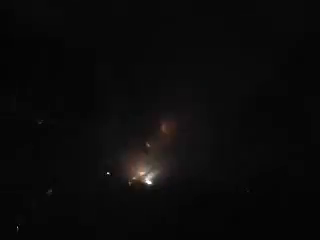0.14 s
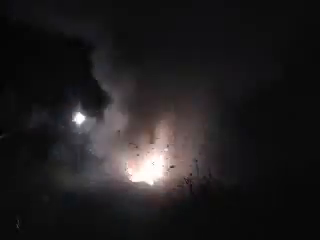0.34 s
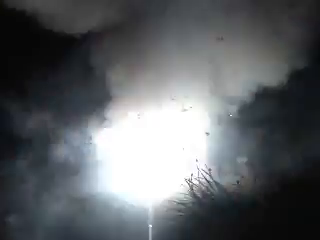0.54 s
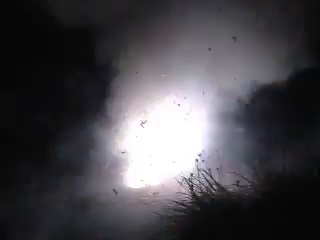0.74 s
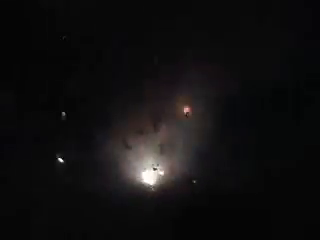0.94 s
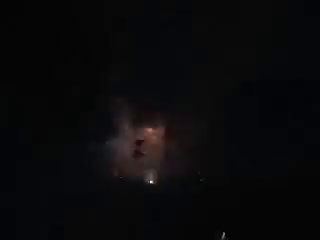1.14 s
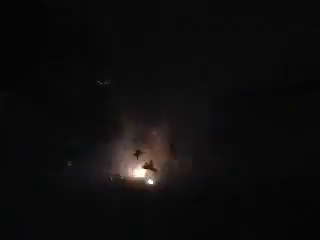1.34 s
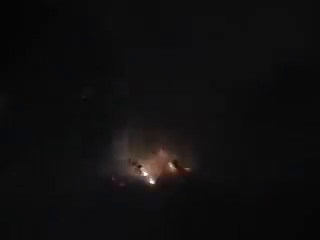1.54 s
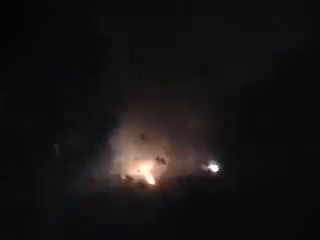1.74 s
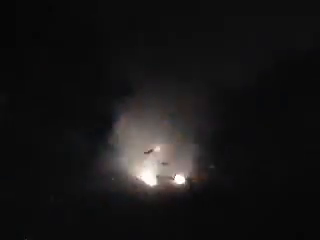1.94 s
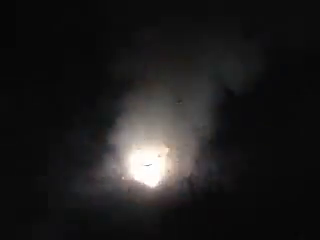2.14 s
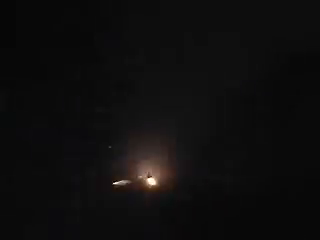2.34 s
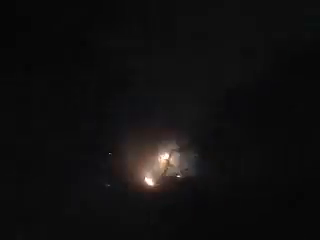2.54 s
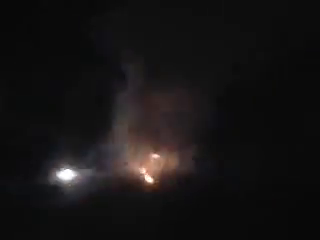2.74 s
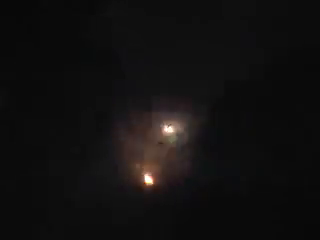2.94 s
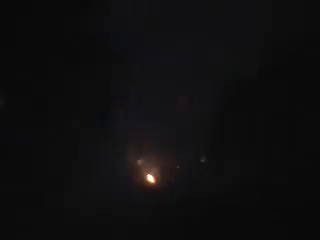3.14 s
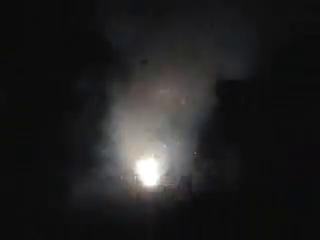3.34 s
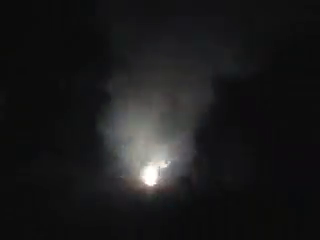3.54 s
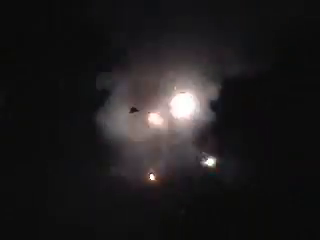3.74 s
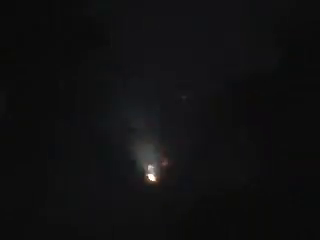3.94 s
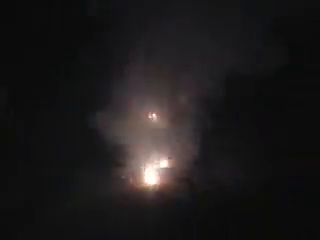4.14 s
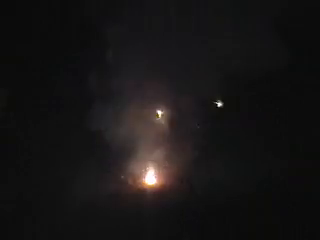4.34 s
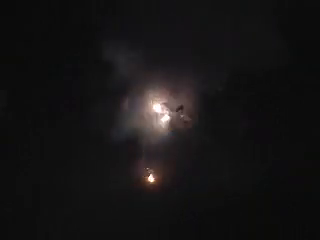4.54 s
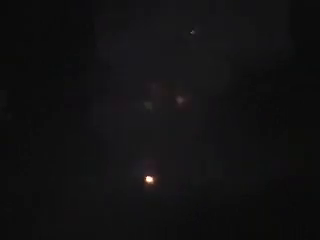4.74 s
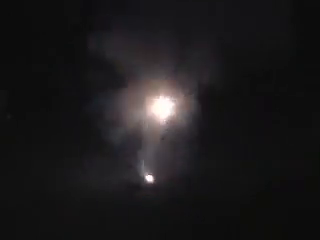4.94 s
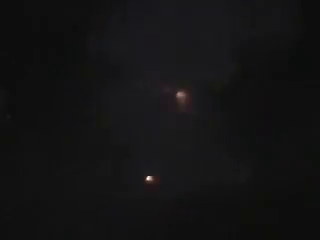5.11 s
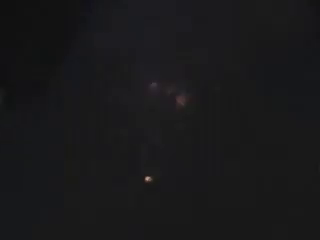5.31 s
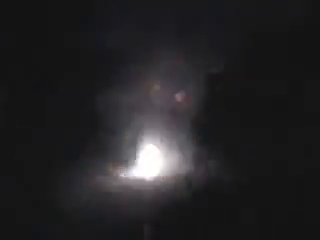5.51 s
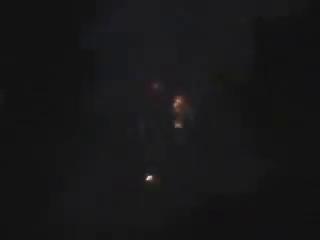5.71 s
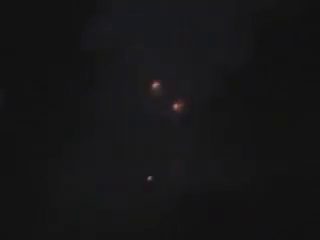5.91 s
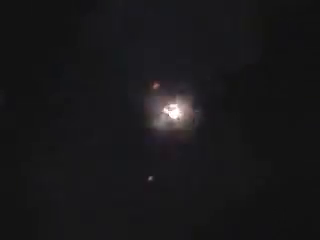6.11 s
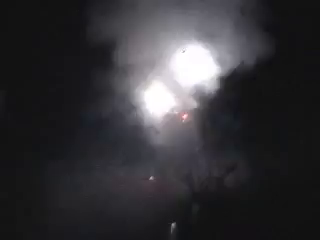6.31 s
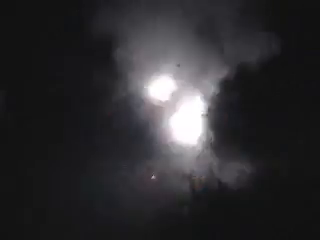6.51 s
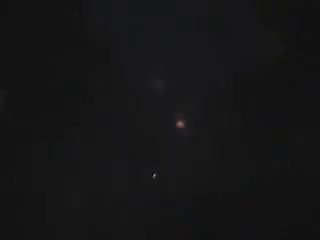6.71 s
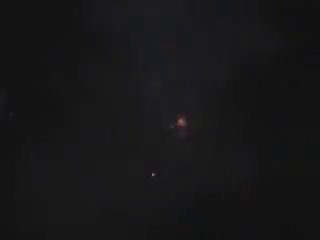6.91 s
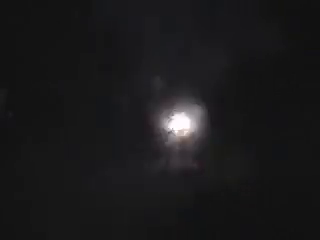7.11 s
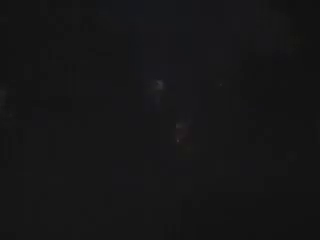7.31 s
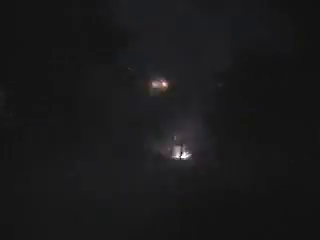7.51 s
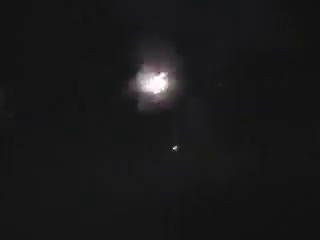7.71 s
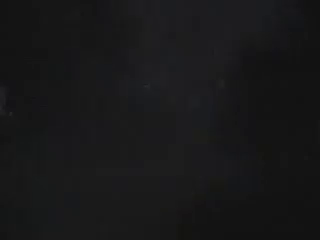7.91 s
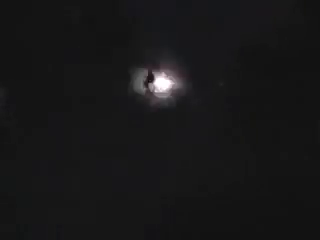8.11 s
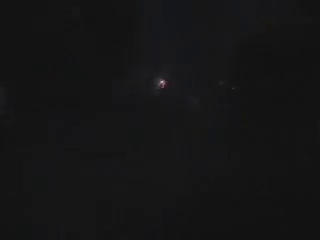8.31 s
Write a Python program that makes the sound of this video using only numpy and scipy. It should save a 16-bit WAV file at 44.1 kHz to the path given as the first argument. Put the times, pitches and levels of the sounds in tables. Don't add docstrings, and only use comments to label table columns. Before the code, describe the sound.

Hundreds of firecracker blasts tear out in a faltering swarm, overloading a small camera microphone, before breaking into separate cracks over a dull outdoor echo.

```python
import sys
import numpy as np
from scipy import signal
from scipy.fft import rfft, irfft, next_fast_len
from scipy.io import wavfile
from scipy.ndimage import uniform_filter1d

SR = 44100
rng = np.random.default_rng(int(sys.argv[2]) if len(sys.argv) > 2 else 0)


def amplitude_ratio(level_db):
    exponent = np.asarray(level_db, float) / 20
    return 10 ** exponent


def materialize(psi):
    bounded = np.clip(np.atleast_2d(psi).T, -1, 1)
    quanta = np.round(bounded * 32767).astype(np.int16)
    wavfile.write(sys.argv[1], SR, quanta)


N = 368676


def rms_one(x):
    return x / np.sqrt(np.mean(x ** 2) + 1e-20)


def in_time(rows):
    s, *columns = np.transpose(rows)
    return [np.interp(np.arange(N) / SR, s, c) for c in columns]


def at_hz(points, hz):
    table_hz, value = np.array(points).T
    return np.interp(np.log(hz + 1), np.log(table_hz), value)


def butter(x, order, hz, kind="low"):
    return signal.sosfilt(signal.butter(order, hz, kind, fs=SR, output="sos"), x)


def butter_zero_phase(x, order, hz, kind="low"):
    return signal.sosfiltfilt(signal.butter(order, hz, kind, fs=SR, output="sos"), x)


def colour(mid, side, spectrum, side_db):
    size = next_fast_len(N)
    hz = np.arange(size // 2 + 1) * SR / size
    gain = rms_one(amplitude_ratio(at_hz(spectrum, hz)))
    m = irfft(rfft(mid, size) * gain, size)[:N]
    s = irfft(rfft(side, size) * gain * amplitude_ratio(at_hz(side_db, hz)), size)[:N]
    return np.array([m + s, m - s])


def grainy(spread_db, per_s):
    sizes = amplitude_ratio(spread_db * np.minimum(rng.exponential(1, N), 3)) * (rng.random(N) < per_s / SR)
    swells = signal.lfilter([1], [1, -.96], sizes)
    return rms_one(rng.standard_normal(N) * (1 + swells))


def train(at, db):
    return np.bincount(at.astype(int), amplitude_ratio(db), N)[:N] + 1e-18


def all_blasts():
    # t/s, level/dB
    swarm_level = [
        (0.0, -7),
        (0.49, -5.5),
        (0.52, -8.5),
        (1.22, -7),
        (2.06, -8.5),
        (2.2, -7.5),
        (2.9, -8),
        (3.6, -11),
    ]
    # t of return/s, length/s, depth/dB
    lulls = [(0.037, 0.033, 16), (0.39, .05, 13), (0.569, 0.033, 12.5), (0.656, 0.037, 20),
             (0.704, 0.054, 17), (0.917, 0.043, 24), (1.268, 0.056, 34), (2.035, 0.041, 29),
             (2.423, 0.036, 14), (2.115, 0.078, 12), (2.186, 0.026, 22), (2.472, 0.13, 17),
             (2.651, 0.051, 20), (2.785, 0.086, 25), (2.958, 0.14, 8), (3.016, 0.038, 22),
             (3.089, 0.057, 31), (3.174, 0.061, 10), (3.282, 0.067, 30), (3.389, 0.062, 17),
             (3.508, 0.14, 25.5)]
    # t/s, peak level/dB, scatter re peak/dB
    ground_roar = [(0.5316, -9, 4), (0.5816, 0, -4), (0.7123, -5, -3), (0.777, 0, -6), (0.9656, 0, -13),
                   (0.9945, -2, -11), (1.6706, -6, -18), (1.922, -16, -18), (2.0035, -15, -15),
                   (2.2957, -13, 7), (2.3336, -4, -4), (2.4243, -5, -5), (2.4688, -4, -4),
                   (2.7814, -6.5, 0), (2.8305, -3.5, -0.5), (2.9632, -3, -3), (3.02, 0, -12)]
    ground_crackle = [(3.3093, -4, 0.5), (3.3493, -3, -7), (3.58, -6.5, 1), (3.6455, -3, -11),
                      (3.654, -9.5, -8), (3.69, -6, 2), (3.7296, -7, 4), (3.7536, 0, -7),
                      (3.801, -9.5, -14), (3.821, -4, 1), (3.841, -1, -1.5), (3.9164, -2, -11),
                      (3.9427, -4.5, -8), (3.9884, -1, -7), (4.1534, 0, -12), (4.2385, -16, -10),
                      (4.567, -9.5, -0.5), (4.6486, -1, -14), (4.8965, -2.5, -25), (4.9116, -6.5, -20),
                      (5.011, -5, -12), (5.25, -10, -2), (5.3672, -7, -12), (5.461, 1.5, -11),
                      (5.592, -3, -2), (5.6048, -12, -9), (5.6314, -7.5, -18), (5.9012, -6, -4),
                      (5.9296, -5, -20), (5.953, -6.5, -1)]
    ground_stragglers = [(6.0553, -4, -15), (6.1213, -4.5, -7), (6.1484, -0.5, -9), (6.264, -4, -4),
                         (6.4097, -2.5, -1), (6.4263, -3, -8.5), (6.676, -4.5, -5), (6.8683, 5, -17),
                         (6.8812, -7.5, -1), (6.9721, -2.5, -3), (6.9783, -10, -14), (7.0563, -2.5, -6.5),
                         (7.1694, -4, -0.5), (7.2556, -5, -5), (7.3, -17, -18), (7.4385, 4.5, -16),
                         (7.5004, -4, -8), (7.589, -6, -2), (7.623, -14, -16), (7.7647, -3.5, -26),
                         (7.82, -4, -6), (7.9876, 1.5, -5.5), (8.218, 5.5, -14)]
    # t/s, peak level/dB, scatter re peak/dB
    air_roar = [(0.158, -9, -7), (0.187, -6, -10), (0.216, -5, -12), (0.236, -6, -10), (0.2823, -15, -14),
                (0.3765, -5, -7), (0.4, -8, -12), (0.63, -6, -17), (0.6564, -4, -18), (0.7043, -10, -10),
                (0.815, -1, -9), (0.9146, -8, -8), (1.066, -4.5, -10), (1.2077, -10, -6), (1.269, -3, -10),
                (1.474, -3, -14), (1.65, 0, -8), (1.7723, -5, -20), (1.812, -3, -7), (1.951, -2, -14),
                (1.976, -8, -22), (2.04, -6.5, 5), (2.0842, -7, -15), (2.127, -5, -2), (2.1787, -11, -14),
                (2.1974, -2, -11), (2.209, -3.5, 1), (2.2495, -6, -6), (2.3785, -7, -8), (2.5505, -18, -5),
                (2.5794, -8.5, 0), (2.645, -8, -15), (2.6636, -9.5, 7), (2.734, -7, -6), (2.8143, -9, 5),
                (2.8777, -3, -3), (2.9307, -7, -6), (3.0598, -9, -6), (3.0756, -3.5, -14), (3.087, -4, 0),
                (3.124, -11, 4), (3.1551, -7, -6.5), (3.18, -11, 7.5), (3.232, -7.5, -2)]
    air_crackle = [(3.2852, -2.5, -1), (3.394, -12, -12), (3.428, -10, -12), (3.437, -4, -2.5),
                   (3.4697, -1.5, -5), (3.487, -1, -7), (3.512, -3.5, -17), (3.5208, -13.5, 5.5),
                   (3.557, -11, 6), (3.61, -4, -3), (3.708, -2.5, -4), (3.868, -9, -8), (3.926, -6, -7),
                   (4.112, 1.5, -8), (4.172, -16, -15), (4.218, -3, -4), (4.245, -3.5, -2.5),
                   (4.272, -9, -11), (4.3119, -5, 5.5), (4.317, -6, -14), (4.335, -3, -6), (4.374, -3, -2),
                   (4.403, -5, -4.5), (4.4376, -4, -7), (4.521, -1.5, -20), (4.5416, -1.5, -4.5),
                   (4.618, -3, -7.5), (4.67, 0, -3), (4.6922, -0.5, -24), (4.7356, -3.5, -0.5),
                   (4.7874, -4, -28), (4.811, -0.5, -0.5), (4.827, -7, -14)]
    air_thinning = [(4.8658, -5, -15), (4.8852, -22, -22), (5.0035, -1, -3), (5.0207, -6.5, 3),
                    (5.04, -6, -1), (5.057, -14, -16), (5.133, -0.5, -7), (5.181, -2.5, -3.5),
                    (5.2298, -1.5, -7), (5.2764, 1, -7), (5.327, -5, 2), (5.3398, -1, -9), (5.469, -4, -3),
                    (5.475, -4, -16), (5.5368, -2.5, -12), (5.576, -5.5, -9), (5.6541, -0.5, -8),
                    (5.796, 0.5, -8), (5.8759, -1, -5), (5.96, -3, -2.5), (5.9755, -5.5, -5),
                    (6.106, -4.5, -3), (6.1357, -5, -6), (6.159, -4, -16), (6.2138, -5, -3),
                    (6.232, -0.5, 0), (6.289, -5, -5), (6.3034, -4.5, -2)]
    air_stragglers = [(6.5249, -1, -6.5), (6.6071, -2, -14), (6.6167, -4.5, -2.5), (6.6306, 1, -9),
                      (6.7075, -2.5, -13), (6.909, -3, -6), (6.928, -21, -14), (6.9492, 2, -8.5),
                      (7.146, -3, -12), (7.19, -9.5, -14), (7.2207, -5.5, -4), (7.271, -6, -2),
                      (7.283, -2, -17), (7.4517, -6, -9), (7.464, -4.5, -5), (7.4817, -16, -15),
                      (7.517, -5, -19), (7.564, -4, -4.5), (7.604, -1.5, -7), (7.692, -3, -15),
                      (7.827, -8, -16), (7.8513, -2, -7)]
    swarm_per_s = 210
    ground_push_db, air_push_db, push_spread_db = -8, -17.5, 0.5

    t, (level_db,) = np.arange(N) / SR, in_time(swarm_level)
    for back_s, length_s, depth_db in lulls:
        sag = np.clip(1 - (back_s - t) / length_s, 0, 1) * (t < back_s)
        level_db = level_db - depth_db * sag
    draw, spread = rng.random(N), rng.standard_normal((3, N))
    at = np.flatnonzero((draw < swarm_per_s / SR) & (t < swarm_level[-1][0]))
    swarm_peak_db = level_db[at] + 0.6 + 2.5 * spread[0, at]
    swarm_push_db = -15 + 3.5 * spread[1, at]
    swarm = np.c_[at, swarm_peak_db, swarm_push_db, np.full(len(at), -13.)]

    ground = ground_roar + ground_crackle + ground_stragglers
    air = air_roar + air_crackle + air_thinning + air_stragglers
    s, peak_db, scatter_db = np.transpose(ground + air)
    push_db = np.where(np.arange(len(s)) < len(ground), ground_push_db, air_push_db)
    push_db = push_db + push_spread_db * spread[2, :len(s)]
    return np.r_[np.c_[np.round(s * SR), peak_db, push_db, scatter_db], swarm]


def tearing(at, peak_db, drive=1.7):
    # f/Hz, level/dB per Hz
    tear_spectrum = [(180, -4.5), (300, 1), (1500, 0.5), (3500, -1.5), (6500, -2.5), (9000, -4.5),
                     (11000, -8.5), (16000, -17)]
    # f/Hz, side re mid/dB
    blast_side = [(60, -26.5), (250, -5), (600, -11), (1200, -15), (3000, -13.5), (9000, -11)]
    full_s, sag_s, fall_s = 0.0042, 0.008, 0.0035

    t = np.arange(round(.02 * SR)) / SR
    shape = np.exp(-t / sag_s) * np.where(t < full_s, 1, np.exp(-(t - full_s) / fall_s))
    power = signal.oaconvolve(train(at, 2 * peak_db), shape ** 2)[:N]
    noise = colour(*rng.standard_normal((2, N)), tear_spectrum, blast_side)
    tilt = np.repeat(amplitude_ratio(1.04 * rng.standard_normal(N // 512 + 1)), 512)[:N]
    dull = butter_zero_phase(noise, 1, 2500)
    bite = np.repeat(amplitude_ratio(3.0 * rng.standard_normal(N // 512 + 1)), 512)[:N] - 1
    middle = butter_zero_phase(noise, 1, [3000, 6500], "band")
    varied = dull / tilt + (noise - dull) * tilt + bite * middle
    return np.sqrt(np.abs(power)) * np.tanh(drive * varied)


def push(at, db):
    push_hz = 304
    t = np.arange(round(.03 * SR)) / SR
    out, chance = np.zeros((2, N + len(t))), rng.standard_normal((len(at), 3))
    for start, gain, (size, a, b) in zip(at.astype(int), amplitude_ratio(db), chance):
        turn = t * push_hz * np.exp(0.23 * size)
        mid = (1 - 2.0 * turn) * np.exp(-2.4 * turn)
        side = 0.21 * a * np.sin(4.5 * turn) * np.exp(-1.5 * turn) + (0.44 * b - .07) * mid
        out[:, start:start + len(t)] += gain * np.array([mid + side, mid - side])
    return butter(out[:, :N], 2, [70, 1200], "band")


def walls(x):
    # delay/s, level/dB, low f/Hz, high f/Hz
    faces = [
        (0.0192, -10.5, 840, 3520),
        (.115, -16.5, 800, 3060),
    ]
    out, mid = np.zeros(N), np.tanh(3.1 * x.mean(axis=0))
    for delay_s, db, low_hz, high_hz in faces:
        lag = round(delay_s * SR)
        rough = rng.standard_normal(200) * np.exp(-np.arange(200) / 43.0)
        band = signal.butter(1, [low_hz, high_hz], "band", fs=SR)
        back = signal.lfilter(*band, np.convolve(mid, rough))
        out[lag:] += amplitude_ratio(db - 16.0) * back[:N - lag]
    return out


def scatter(at, db, weight_db):
    # f/Hz, level/dB per Hz
    bush_spectrum = [(40, -2.5), (100, -33.5), (550, -7), (800, -8.5), (1300, -4), (1900, -2.5),
                     (3000, -5.5), (4500, -14), (10000, -20), (13000, -36)]
    # f/Hz, side re mid/dB
    bush_side = [(60, -39), (1000, -81), (4000, -56), (10000, -18)]
    # f/Hz, T60/s
    bush_t60 = [(100, 0.26), (600, 0.19), (2000, 0.13), (9000, 0.12)]
    noise = colour(grainy(2.0, 250), rng.standard_normal(N), bush_spectrum, bush_side)
    late, out = at + round(.004 * SR), 0
    octaves_hz = 50 * 2 ** np.arange(9)
    for low, high in zip(octaves_hz, octaves_hz[1:]):
        clicks = train(late, 2 * (db + weight_db * (high <= 800)))
        fall = amplitude_ratio(-2 * 60 / (at_hz(bush_t60, np.sqrt(low * high)) * SR))
        power = signal.lfilter([1], [1, -fall], clicks)
        power = signal.lfilter([.01], [1, -.99], power)
        out = out + np.sqrt(power) * butter(noise, 2, [low, high], "band")
    return out


def leaves(at, db, t60_s=0.68):
    # f/Hz, level/dB per Hz
    leaf_spectrum = [(60, -21), (500, -8.5), (2500, -6.5), (5000, -0.5), (9000, -6), (12500, -9.5)]
    power = signal.lfilter([1], [1, -amplitude_ratio(-2 * 60 / (t60_s * SR))], train(at, 2 * db))
    power = signal.lfilter([.002], [1, -.998], power)
    leaf_side = [(100, -46.0), (12000, 3.5)]   # f/Hz, side re mid/dB
    return np.sqrt(power) * colour(*rng.standard_normal((2, N)), leaf_spectrum, leaf_side)


def quiet_time(at):
    lag_s = 0.025
    blast_here = np.bincount(at.astype(int), minlength=N) > 0
    last = np.maximum.accumulate(np.arange(N) * blast_here)
    keep = np.exp(-1 / (lag_s * SR))
    return signal.lfilter([1 - keep], [1, -keep], (np.arange(N) - last) / SR)


def wash(quiet_s):
    # t/s, level/dB
    wash_level = [(0.0, -9.5), (0.51, -14), (1.69, -11), (2.36, -16.5), (2.77, -15), (3.3, -22),
                  (4.01, -20.5), (5.36, -20), (5.86, -21), (7.1, -21.5), (8.36, -20.5)]
    # f/Hz, level/dB per Hz
    far_spectrum = [(40, -22), (120, -2.5), (400, -3), (600, -6.5), (900, -1), (1750, -2), (2500, -0.5),
                    (4000, -6), (9800, -12.5), (13000, -18.5)]
    # f/Hz, side re mid/dB
    far_side = [(60, 4), (300, -3.5), (700, -4), (1500, -7.5), (2600, -7.5), (5000, -3.5), (10000, -10.5)]
    dulling_db_per_s, narrowing_db_per_s = 37, 83

    level_db, = in_time(wash_level)
    bright_db = 3.5 - dulling_db_per_s * quiet_s
    width_db = -narrowing_db_per_s * quiet_s
    left, right = colour(grainy(1.0, 200), rng.standard_normal(N), far_spectrum, far_side)
    side = (left - right) / 2 * amplitude_ratio(6.8 * width_db)
    noise = (left + right) / 2 + np.array([side, -side])
    treble = (amplitude_ratio(bright_db) - 1) * butter_zero_phase(noise, 1, 4500, "high")
    bass = (amplitude_ratio(2.6 * np.minimum(width_db, 0)) - 1) * butter_zero_phase(noise, 2, 300)
    return amplitude_ratio(level_db) * (noise + treble + bass)


def scene():
    at, peak_db, push_db, scatter_db = all_blasts().T
    direct = tearing(at, peak_db) + push(at, peak_db + push_db + 6.5)
    near = direct + walls(direct)
    near = near + scatter(at, peak_db + scatter_db + 0.5, 0.12 * (push_db + 15.5))
    return near + leaves(at, peak_db - 23.5) + wash(quiet_time(at))


def limiter(dry):
    late_s = 0.0015
    level_db = 10 * np.log10(signal.lfilter([.012], [1, -.988], np.mean(dry ** 2, axis=0)) + 1e-12)
    level_db = np.interp(np.arange(N) - late_s * SR, np.arange(N), level_db)
    held = dry * amplitude_ratio(-.6 * np.maximum(level_db + 8, 0)) * amplitude_ratio([[-.25], [.25]])
    lasting = signal.lfilter([.0004], [1, -.9996], np.mean(held ** 2, axis=0))
    top = np.clip(.45 - .035 * 10 * np.log10(lasting + 1e-12), .8, 1.12)
    return held / (1 + np.abs(held / top) ** 6) ** (1 / 6)


def line_gate(x, frame, step_db, side_step_db):
    # f/Hz, gain/dB
    roll_off = [(9000, 0), (11000, 0), (12000, 1.5), (12900, 1), (13200, -45)]
    # f/Hz, gain/dB
    capsule = [(60, -1.5), (250, -1), (430, 0.5), (600, 2), (820, 0), (1200, -2), (1650, 1.5), (2200, -1.5),
               (3600, 0.5), (5000, -1.5), (9000, -0.4)]
    cutoff_hz, sparse_hz, starving_db, side_lift_db = 12900, 5000, 3.5, 1

    hz, _, both = signal.stft([x[0] + x[1], x[0] - x[1]], SR, nperseg=frame)
    both = both * amplitude_ratio(at_hz(roll_off, hz) + at_hz(capsule, hz))[:, None]
    power = uniform_filter1d(np.abs(both) ** 2, size=2, axis=2)
    size = np.sqrt(uniform_filter1d(power, size=3, axis=1))
    typical = np.sqrt(np.mean(size[0, hz < cutoff_hz] ** 2, axis=0))
    chance = np.repeat(rng.standard_normal(len(typical)), 2)[:len(typical)]
    starved = amplitude_ratio(starving_db * chance) ** np.clip(hz / 6000 - 1, 0, 1)[:, None]
    masking = uniform_filter1d(size[0], size=frame // 50, axis=0) + typical
    rising_db = step_db + np.clip(hz - 10200, 0, 2600)[:, None] / 260
    both[0] *= (size[0] > amplitude_ratio(rising_db) * typical * starved) | (hz < sparse_hz)[:, None]
    side_kept = size[1] > amplitude_ratio(side_step_db) * masking / 2
    side_allowed = (both[0] != 0) | (hz < 12000)[:, None]
    both[1] *= amplitude_ratio(side_lift_db) * side_kept * side_allowed
    mid, side = signal.istft(both, SR, nperseg=frame)[1][:, :N]
    return np.array([mid + side, mid - side]) / 2


def camera_processor(x):
    power = np.mean(x ** 2, axis=0)
    now = uniform_filter1d(power, size=130)
    before = uniform_filter1d(power, size=1300, origin=600)
    near = uniform_filter1d(1. * (now > 4.5 * before), size=900) > 0
    short = uniform_filter1d(1. * near, size=250)
    return line_gate(x * short, 512, -12.0, -9.5) + line_gate(x * (1 - short), 4096, -12.0, -7.5)


def top_cut(x):
    return signal.sosfilt(signal.butter(12, 12970, fs=SR, output="sos"), x)


def record(dry):
    mix = butter(camera_processor(limiter(dry)), 1, 90, "high")
    return top_cut(mix)


dry = scene()
out = record(dry)
materialize(out)
```